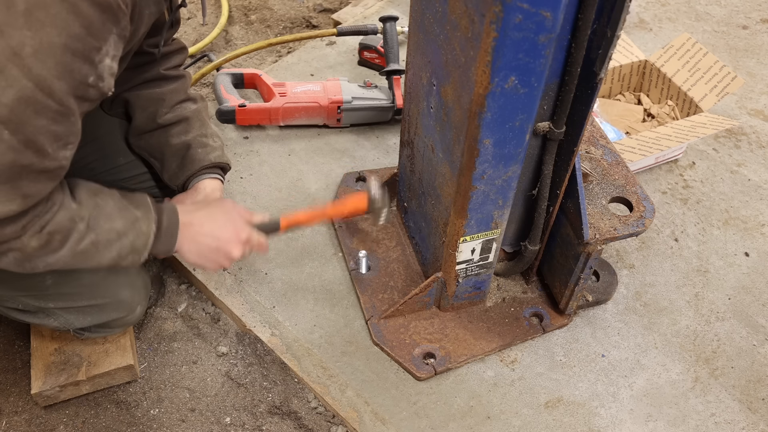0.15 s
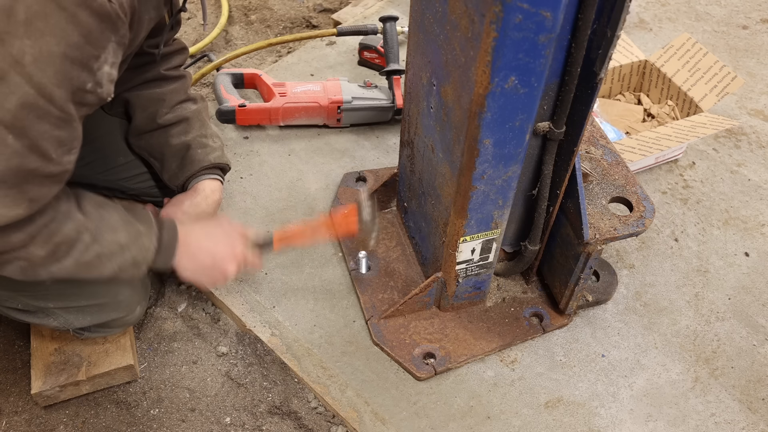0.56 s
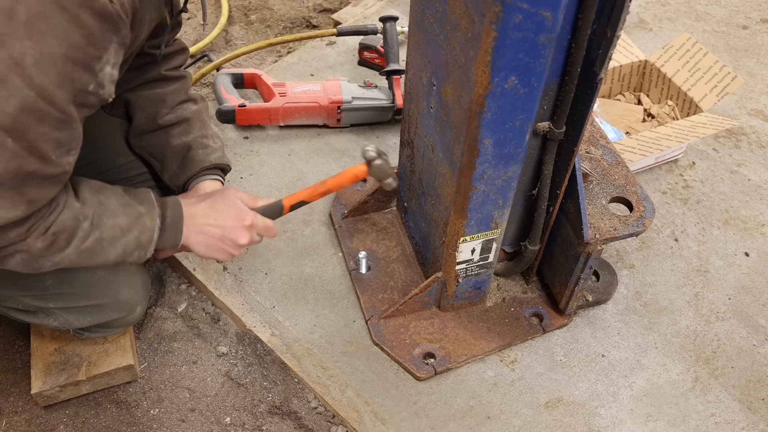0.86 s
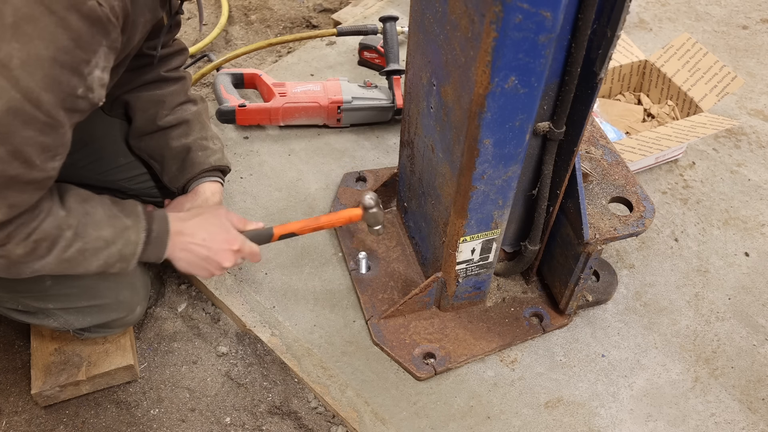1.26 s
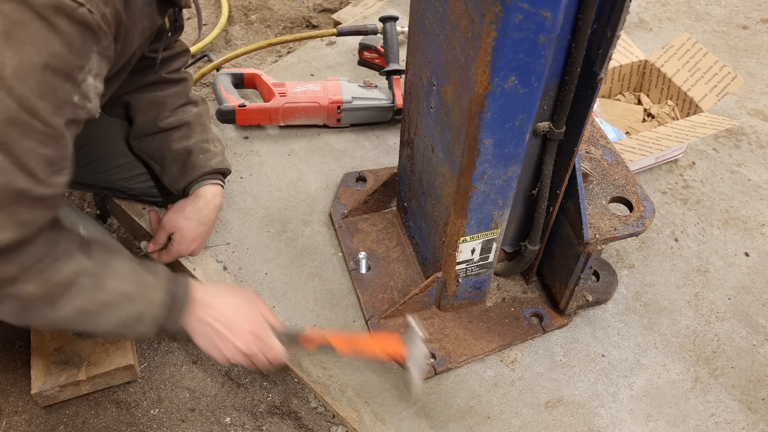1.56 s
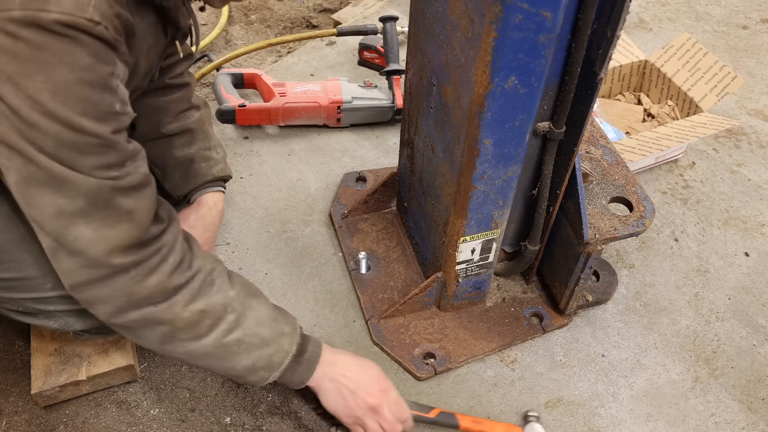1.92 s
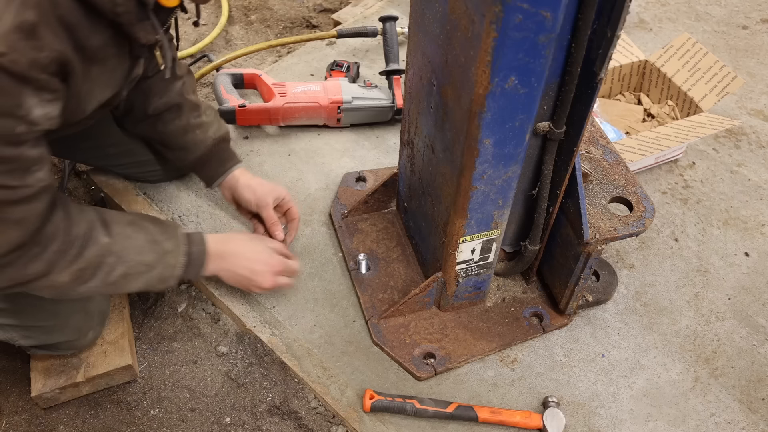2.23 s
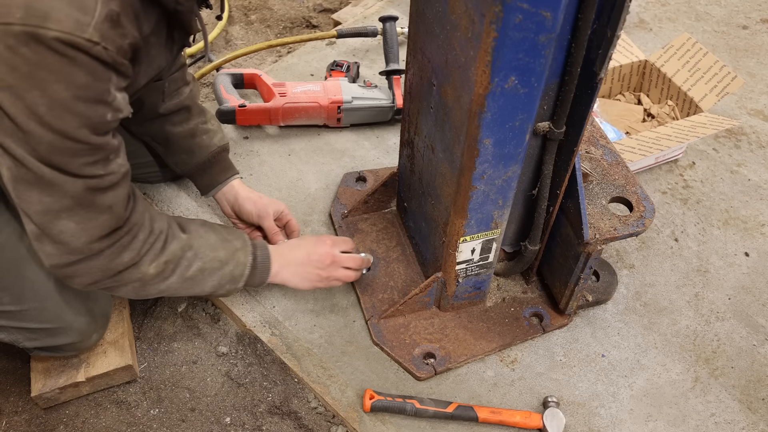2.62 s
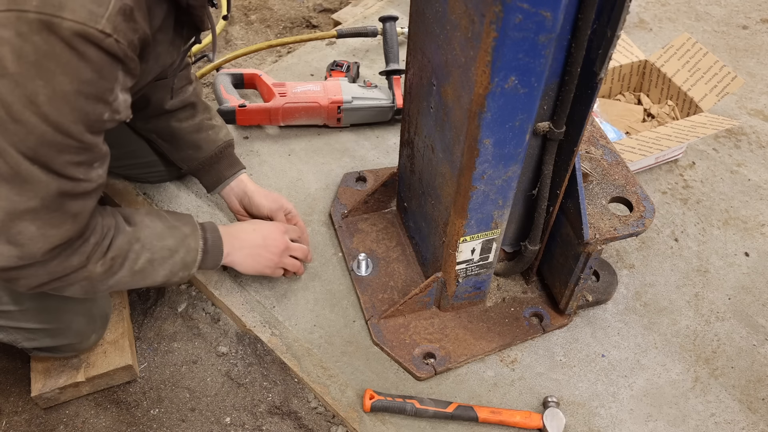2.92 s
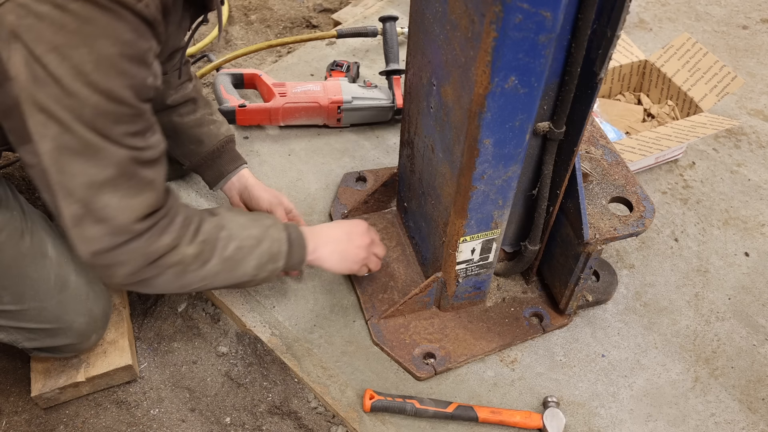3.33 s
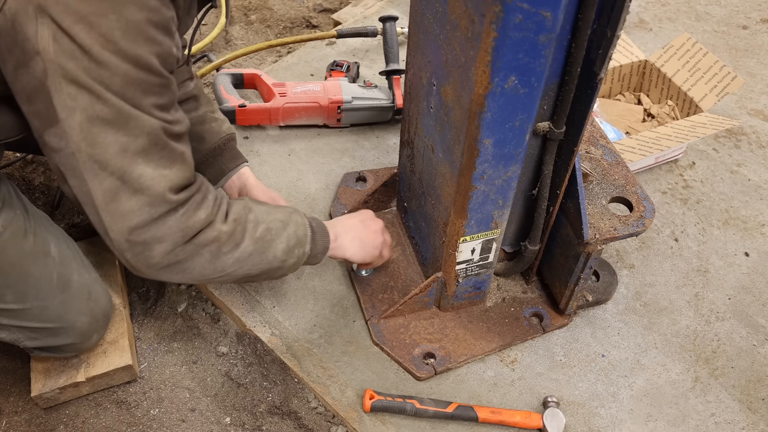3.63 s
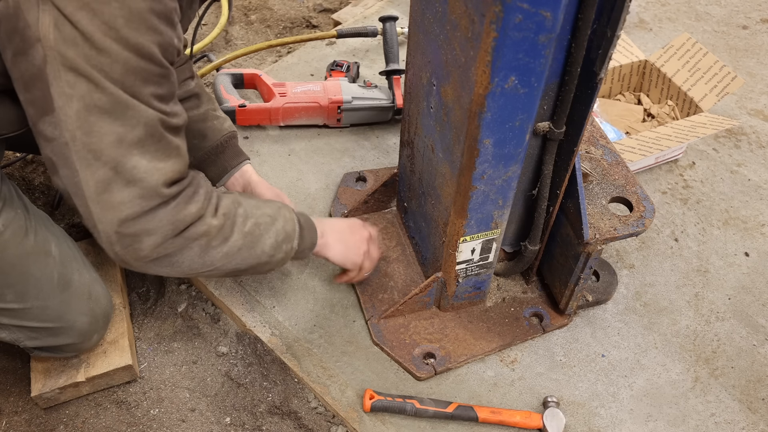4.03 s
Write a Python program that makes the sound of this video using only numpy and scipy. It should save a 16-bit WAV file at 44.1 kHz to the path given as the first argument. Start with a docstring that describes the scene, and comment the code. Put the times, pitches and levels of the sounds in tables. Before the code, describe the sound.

Close, single-channel pickup in a moderately echoing workshop: several loud, bright hammer blows on a steel anchor bolt, with plate buzz, slab thud and a hollow post hum. A jacket rustles, the hammer is put down on concrete in dull knocks and a hard clack, a washer ticks and rings down the thread onto the plate, then faint distant clanks and a nut's scrape.

```python
"""A hammer drives an anchor bolt through a post's steel base plate into a concrete workshop floor: noise cracks
over dying modes of bolt, plate, slab and post. A jacket rustles as noise that follows the arm. The hammer is
laid down in dull knocks and its handle clacks. A washer ticks down the thread, its beating tone ringing, and
lands on the plate. Metal clanks further off, and a nut scrapes and ticks as it is started. Quiet hall air lies
beneath from the start."""
import sys
import numpy as np
from scipy import signal
from scipy.fft import rfft, irfft
from scipy.io import wavfile
from scipy.ndimage import uniform_filter1d

SR = 44100
rng = np.random.default_rng(int(sys.argv[2]) if len(sys.argv) > 2 else 0)


def master(y):
    """Save y as 16-bit WAV."""
    cut = np.clip(np.atleast_2d(y).T, -1, 1)
    pcm = np.round(cut * 32767)  # scale
    wavfile.write(sys.argv[1], SR, pcm.astype(np.int16))


N = 184179
T = np.arange(SR) / SR  # one second of time [s]

# hum of the hollow post: (frequency [Hz], relative level [dB], unshortened t60 [s])
POST_MODES = [(147.6, -22, 0.87), (186, -23, 0.98), (243, -28, 0.1), (366, -26.5, 0.8),
              (445.5, -25.5, 0.36)]
# noise of steel meeting steel, for the landing and the far clanks: (frequency [Hz], level per Hz [dB])
CLANK_COLOUR = [(60, -10), (300, -22.5), (550, -15.5), (1300, 4), (2000, -6), (3000, 1.5), (5000, -11),
                (8000, -21), (15000, -48)]


def gain_of(db):
    """Turns decibels into an amplitude factor."""
    return np.exp(np.maximum(db, -300) * (np.log(10) / 20))


def evened(x):
    """Scales a signal to an rms of one."""
    return x / np.sqrt(np.mean(x ** 2) + 1e-20)


def read(points, hz):
    """Reads a table on a log-frequency axis."""
    f, value = np.transpose(points)
    return np.interp(np.log(hz + 1), np.log(f + 1), value)


def add(mix, s, sound):
    """Mixes a sound in at time s, trimming what lies outside the scene."""
    start = round(s * SR)
    sound = sound[max(-start, 0):]
    part = mix[max(start, 0):][:len(sound)]
    part += sound[:len(part)]


def slope_db(hz, tilt):
    """Brightens or dulls by tilt dB per octave about 3 kHz, levelling out below 300 Hz."""
    return tilt * np.log2(np.maximum(hz, 300) / 3000)


def noise(spectrum, size, tilt=0):
    """Noise of a given colour and random phase, at an rms of one."""
    hz = np.fft.rfftfreq(size, 1 / SR)
    phase = np.exp(2j * np.pi * rng.random(len(hz)))
    level_db = read(spectrum, hz) + slope_db(hz, tilt)
    return evened(irfft(gain_of(level_db) * phase, size))


def contact(spectrum, crest_s, fall_s, size=2048):
    """The brief crunch of two hard faces meeting: noise that rises to a crest and dies."""
    t = T[:size]
    rise = np.minimum(t / crest_s, 1)
    fall = np.exp(-np.maximum(t - crest_s, 0) / fall_s)
    return np.pad(noise(spectrum, size)[:size] * rise * fall, (0, SR - size))


def favour(x, hz, db, width=0.026):
    """Lifts a band around hz: where a blow lands decides what speaks most."""
    b, a = signal.iirpeak(min(hz, .45 * SR), 1 / width, fs=SR)
    return x + (gain_of(db) - 1) * signal.lfilter(b, a, x)


def ring(modes, rise_s, pitch=1):
    """Dying modes that build up during the contact; the pitch factor may be a curve."""
    clock = np.cumsum(pitch * np.ones(SR)) / SR
    waves = 0
    for hz, db, t60 in modes:
        waves = waves + gain_of(db - 60 * T / t60) * np.sin(2 * np.pi * hz * clock)
    return waves * (1 - np.exp(-T / rise_s))


def hall(x, length=1, delay_s=0.0069):
    """Dense echoes from floor and walls, in which the higher treble dies sooner."""
    # decay of the hall at length 1: (frequency [Hz], t60 [s])
    hall_decay = [(60, 0.2), (170, 0.6), (400, 0.68), (1200, 0.49), (3000, 0.38), (7000, 0.31),
                  (11000, 0.25), (15000, .18)]
    # colour of the echoes: (frequency [Hz], level [dB])
    hall_colour = [(50, -10), (100, -4), (170, 1), (240, -0.5), (480, 6.5), (700, 4), (1200, -4),
                   (3000, -5.5), (8000, -3), (15000, -7.5)]
    hz, t, z = signal.stft(rng.choice([-1., 1.], SR), SR, nperseg=256)
    fall_db = 60 * t / (length * read(hall_decay, hz)[:, None])
    z = z * gain_of(read(hall_colour, hz)[:, None] - fall_db)
    tail = signal.istft(z, SR, nperseg=256)[1][:SR]
    near = 1 + 1.0 * np.exp(-T / 0.0086)  # the post and the floor answer first
    onset = 1 - np.exp(-(T / delay_s) ** 2)
    tail = tail * near * onset / np.sqrt(0.028 * SR)
    return signal.fftconvolve(x, tail)[:SR]


def taps(rows, spectrum, modes, modes_db, crest_s, fall_s, length):
    """Light contacts on one steel object, each with its own brightness and share of echo."""
    out, hz = np.zeros(N), np.fft.rfftfreq(SR, 1 / SR)
    tone = gain_of(modes_db) * ring(modes, crest_s)
    for s, db, tilt, room_db in rows:
        tap = contact(spectrum, crest_s, fall_s) + tone
        coloured = irfft(rfft(tap) * gain_of(slope_db(hz, tilt)), SR) * (T < .5)
        # the brightness leaves the energy as it was
        tap = coloured * np.linalg.norm(tap) / np.linalg.norm(coloured)
        add(out, s, gain_of(db) * (tap + gain_of(room_db) * hall(tap, length)))
    return out


def rub(spectrum, length, tilt=0, grit_db=3):
    """A short slide of one surface on another: noise whose level is roughened by grit."""
    size = int(length * SR)
    grit = gain_of(grit_db * evened(uniform_filter1d(rng.standard_normal(SR), size=80)))
    return evened((noise(spectrum, SR, tilt) * grit)[:size]) * signal.windows.tukey(size, .5)


def chatter(rise_s=.006):
    """The struck plate buzzes against the concrete: noise that swells quickly and dies away."""
    # colour of the buzz: (frequency [Hz], level per Hz [dB])
    clatter_colour = [(300, -24), (880, 2.5), (1300, 3), (1750, -5.5), (2400, -3), (3000, -6.5),
                      (3700, 0.5), (4300, -14), (8000, -28)]
    level_db, t60_s = -22.5, 0.39
    envelope = gain_of(level_db - 60 * T / t60_s) * (1 - np.exp(-T / rise_s))
    return envelope * noise(clatter_colour, SR)


def hammering():
    """Each blow cracks, rings bolt and plate, thuds into the slab and sets the hollow post humming."""
    # blows and rebounds: (time [s], level [dB], band favoured by the spot struck [Hz], its lift [dB],
    # share reaching the plate and its chatter [dB], share reaching the post [dB])
    blows = [(-0.035, -25, 600, 15, -8.5, -5.5), (0.005, -36, 8500, 19, -7, -9.5),
             (0.0168, -35, 3050, 9, -6.5, -7), (0.1137, -20.5, 8600, 12, -8.5, -4),
             (0.21, -48.5, 3700, 16, 1.5, -6), (0.604, -23.5, 2510, 6.5, -13.5, -2.5),
             (1.0153, -21.5, 2280, 4.5, 2, -1), (1.0263, -32, 3560, 14.5, -5, 2)]
    # crack of steel on steel: (frequency [Hz], level per Hz [dB])
    crack_colour = [(40, -3.5), (150, 7.5), (320, 0.5), (620, -6.5), (900, -2.5), (1250, 2.5), (1650, -4),
                    (2400, 0.5), (3700, -4), (4700, -9), (6600, -6.5), (9000, -8), (12000, -23.5),
                    (15500, -33.5)]
    # bolt, before the pitch factor: (frequency [Hz], relative level [dB], t60 [s])
    bolt_modes = [(3678, -7, 0.051), (3220, -18.5, 0.017), (7300, -12, 0.035), (11360, 2.5, 0.025),
                  (11340, -12.5, 0.022)]
    # plate: (frequency [Hz], relative level [dB], t60 [s])
    plate_modes = [(873, -6, 0.12), (960, -14, 0.27), (1148, -8, .1), (1266, -10.5, 0.21),
                   (1230, -26.5, 0.64), (1453, -20, 0.51), (2324, -17, .18), (2960, -18, 0.16),
                   (3590, -20, 0.19), (3780, -19.5, .26), (5100, -4, 0.015), (8270, -15, 0.065),
                   (8510, -7, 0.085), (8400, -8, 0.07)]
    # slab: (frequency [Hz], relative level [dB], t60 [s])
    thud_modes = [(48.3, -8.5, 0.097), (84, -14.5, 0.066), (160.6, -12, 0.13), (308, -3, 0.074),
                  (380, -7, 0.066)]
    squeal_ref_hz = 11300  # the bolt's squeal at a pitch factor of one
    squeal_first_hz, squeal_sag_hz_per_s = 11200, 620  # it sinks as the bolt is driven in
    thud_db, thud_softness = -4, .15  # thud share of the hardest blow; dB more for each dB softer
    room_db, ring_length = -3, 0.77  # echo share; length factor of post hum and echo
    out, plate, thud = np.zeros(N), ring(plate_modes, 0.0018), ring(thud_modes, 0.0023)
    hum = ring([(hz, level, t60 * ring_length) for hz, level, t60 in POST_MODES], 0.012)
    hardest_db = max(row[1] for row in blows)
    for s, db, spot_hz, spot_db, plate_db, post_db in blows:
        crack = favour(contact(crack_colour, crest_s=0.0023, fall_s=0.0034), spot_hz, spot_db)
        # the hole grips unevenly, so the bolt rings roughly
        grip = 1 + .022 * evened(uniform_filter1d(rng.standard_normal(SR), size=40))
        squeal_hz = squeal_first_hz - squeal_sag_hz_per_s * s
        bolt = ring(bolt_modes, 0.002, grip * squeal_hz / squeal_ref_hz)
        steel = gain_of(-2.5) * bolt + gain_of(plate_db - 9.0) * plate + gain_of(plate_db) * chatter()
        blow_thud_db = thud_db + thud_softness * (hardest_db - db)
        body = gain_of(blow_thud_db) * thud + gain_of(post_db) * hum
        sent = gain_of(1.0) * crack + gain_of(-4.5) * steel + gain_of(-19) * body
        echo = hall(sent, ring_length)
        add(out, s, gain_of(db) * (crack + steel + body + gain_of(room_db) * echo))
    return out


def hall_air(level_db=-76.5):
    """The quiet air of the hall, a steady coloured noise."""
    # colour of the air: (frequency [Hz], level per Hz [dB])
    air_colour = [(15, -53), (25, -14.5), (163, 2), (250, -14), (326, -4), (1030, -21), (1280, -13.5),
                  (1460, -18), (9770, -31), (15000, -33.5)]
    return gain_of(level_db) * noise(air_colour, N)


def movement(rise_s=.17, fall_s=0.2):
    """How briskly the arm moves, as an amplitude: each movement swells, holds and dies away."""
    # the arm puts the hammer away, fetches the washer, fetches the nut, turns it:
    # (time [s], length before the fall [s], strength [dB])
    moves = [(1.16, 0.81, -67), (2.152, 0.69, -67), (3.035, 0.51, -70), (3.601, .55, -74.5)]
    t = np.arange(N) / SR
    swells = []
    for s, length, db in moves:
        rise = np.clip((t - s) / rise_s, 0, 1)
        fall = np.exp(-np.maximum(t - s - length, 0) / fall_s)
        swells.append(gain_of(db) * rise * fall)
    return np.linalg.norm(swells, axis=0)


def jacket(grain_db=1.0, body_db=3):
    """Cloth rustles as grainy noise with the arm's movement, with faint rising zips."""
    # colour of the cloth: (frequency [Hz], level per Hz [dB])
    cloth_colour = [(35, -37), (60, 0.5), (364, 0), (648, -4.5), (895, -4), (1390, -7.5), (2650, -14),
                    (3050, -14), (4730, -25), (6380, -18), (13100, -33.5), (15000, -52.5)]
    # the sleeve zips as the arm swings:
    # (time [s], length [s], first frequency [Hz], last frequency [Hz], level [dB])
    zips = [(1.23, 0.23, 6200, 7500, -84), (1.602, 0.15, 2520, 3490, -71)]
    fizz_db, fizz_follow = -75, 0.58  # treble in the briskest movement; dB for each dB of the body
    grain = gain_of(grain_db * evened(uniform_filter1d(rng.standard_normal(N), size=300)))
    cloth = noise(cloth_colour, N) * grain
    body = signal.sosfiltfilt(signal.butter(2, 3200, fs=SR, output="sos"), cloth)
    arm = movement()
    fizz_level = gain_of(fizz_db) * (arm / arm.max()) ** fizz_follow
    out = gain_of(body_db) * arm * evened(body) + fizz_level * evened(cloth - body)
    for start, length, first_hz, last_hz, db in zips:
        size = int(length * SR)
        waver = 1 + 0.032 * evened(uniform_filter1d(rng.standard_normal(N), size=40))[:size]
        hz = first_hz + (last_hz - first_hz) * np.sin(np.linspace(0, np.pi / 2, size))
        tone = np.sin(2 * np.pi * np.cumsum(hz * waver) / SR)
        add(out, start, gain_of(db) * tone * signal.windows.tukey(size, .5))
    return out


def laying_down(hum_db=-36):
    """The head is set on the concrete and stirs the post a little; the handle follows with a dead clack."""
    # the hammer touches down: (time [s], level [dB], brightness [dB per octave], room [dB])
    knocks = [(1.7508, -50, -3.5, -12), (1.8135, -57, 1.5, -19), (1.853, -46, -5.5, -3),
              (1.9325, -55, -2, -3), (2.0988, -32.5, 3.5, -17.5), (2.103, -39, 1, -0.5)]
    # noise of steel on concrete: (frequency [Hz], level per Hz [dB])
    knock_colour = [(50, -17), (170, 7.5), (300, -7), (550, 10), (800, 1), (1300, 3.5), (2200, -5),
                    (3100, -3), (4500, -7), (7000, -8.5), (10000, -23.5), (15000, -38)]
    # hammer head: (frequency [Hz], relative level [dB], t60 [s])
    head_modes = [(1040, -3, 0.028), (1276, 3, 0.032), (1970, -3, 0.041), (3207, 5.5, 0.029),
                  (3274, -5, 0.037), (3470, 3, 0.019), (4400, -28, 0.011)]
    # the handle drops last with a dead clack that does not ring: (time [s], level [dB])
    handle = (2.1897, -34)
    out = taps(knocks, knock_colour, head_modes, modes_db=-3.5, crest_s=0.0013, fall_s=0.0024, length=0.74)
    hardest = max(knocks, key=lambda row: row[1])
    add(out, hardest[0], gain_of(hum_db) * ring(POST_MODES, 0.0017) * np.exp(-T / .19))
    s, db = handle
    clack = favour(contact(knock_colour, crest_s=0.0025, fall_s=0.0012), hz=3020, db=15, width=0.15)
    add(out, s, gain_of(db) * clack)
    return out


def scuffs():
    """Sleeve and grit scuff in short gritty slides."""
    # slides: (time [s], length [s], level [dB], brightness [dB per octave])
    scuff_rows = [(1.801, 0.05, -62, -0.5), (1.846, 0.044, -56, -4), (1.943, 0.064, -63, -8),
                  (2.385, 0.017, -62, -5), (3.941, 0.034, -61, -6.5)]
    # colour of the scuffs: (frequency [Hz], level per Hz [dB])
    scuff_colour = [(100, -4), (400, -3), (1500, -4.5), (3500, -4), (5200, -10), (7000, 10.5), (9000, -7),
                    (15000, -13)]
    out = np.zeros(N)
    for s, length, db, tilt in scuff_rows:
        add(out, s, gain_of(db) * rub(scuff_colour, length, tilt))
    return out


def threading(count=3):
    """Single ticks as the washer is picked up and on the thread, and runs in which the washer catches on one
    turn after another."""
    # washer and nut tick, first as the washer is picked up, then on the thread: (time [s], level [dB],
    # brightness [dB per octave])
    ticks = [(2.314, -50, 22.5), (2.3207, -52, 20), (2.583, -33, 4), (2.589, -37.5, -7), (2.6398, -34, 9.5),
             (2.6665, -46, -0.5), (2.368, -60, 10.5), (3.878, -56, -5), (4.0177, -54, -5.5),
             (4.022, -57, -9)]
    # the washer skips down in short runs: (time [s], level [dB])
    skips = [(2.6934, -48), (2.7236, -45)]
    # noise of a tick: (frequency [Hz], level per Hz [dB])
    tick_colour = [(60, -13), (400, -24.5), (1500, -16.5), (3300, 3), (5200, -11.5), (7000, -1.5),
                   (10000, -27.5), (15000, -39.5)]
    # ring of a tick: (frequency [Hz], relative level [dB], t60 [s])
    thread_modes = [(3304, -1.5, 0.042), (3420, -4.5, 0.037), (3700, -6.5, 0.034), (7300, -11, 0.0054)]
    skip_gap_s, skip_tilt = .0069, 0  # time from turn to turn; brightness in dB per octave
    room_db = -10
    runs = [(s + k * skip_gap_s, db, skip_tilt) for s, db in skips for k in range(count)]
    rows = [(s, db, tilt, room_db) for s, db, tilt in ticks + runs]
    return taps(rows, tick_colour, thread_modes, modes_db=-5, crest_s=0.00048, fall_s=.0012, length=1.0)


def washer(depth=0.5, t60=0.4, room_db=-22, flutter_db=-27):
    """The washer's bending mode is split in two and beats as it wobbles down the bolt."""
    # each contact sets the ring going anew: (time [s], level [dB], time until the swell's crest [s])
    rings = [(2.583, -30.5, 0.0086), (2.6404, -23.5, 0.028), (2.676, -26, .04), (2.737, -26.5, 0.022),
             (2.792, -46, 0.037)]
    washer_hz, beat_hz = 8430, 16  # pitch; distance between the two halves of the split mode
    t = np.arange(N) / SR
    s, db, crest = np.transpose(rings)
    last = np.maximum(np.searchsorted(s, t) - 1, 0)  # the latest contact at each moment
    age = t - s[last]
    pair = abs(1 + depth * np.exp(2j * np.pi * beat_hz * (age - crest[last]))) / (1 + depth)
    decay = gain_of(db[last] - 60 * np.maximum(age, 0) / t60)
    level = uniform_filter1d((age > 0) * pair * decay, size=50)
    tone = np.sqrt(2) * level * np.sin(2 * np.pi * washer_hz * t)
    # a low flutter goes with it
    flutter = noise([(15, -6.5), (38, 2.5), (90, -19.5), (400, -47.5), (2000, -66.5)], N)
    out = tone + gain_of(flutter_db) * level * flutter
    add(out, s[0], gain_of(room_db) * hall(tone[round(s[0] * SR):][:SR], length=0.65))
    return out


def washer_landing():
    """The washer lands on the plate: bright contacts over short dying modes."""
    # contacts: (time [s], level [dB], brightness [dB per octave], room [dB])
    landings = [(2.778, -44, -4, 0), (2.7925, -37.5, 1, 1)]
    # washer on plate: (frequency [Hz], relative level [dB], t60 [s])
    seat_modes = [(1080, -29.5, 0.11), (1220, -15, 0.14), (1236, -9, 0.11), (1408, -16.5, .22),
                  (1340, -20, 0.2), (1540, -15.5, 0.25), (2925, -3.5, 0.044)]
    return taps(landings, CLANK_COLOUR, seat_modes, modes_db=-0.5, crest_s=0.00077, fall_s=0.0019, length=0.92)


def far_clanks():
    """Steel clanks further off: contacts and dying modes with their echoes."""
    # contacts: (time [s], level [dB], brightness [dB per octave], room [dB])
    clanks = [(3.3795, -40.5, -0.5, 0.5), (3.3855, -42, 9.5, -4.5), (3.5432, -49, -1, -2.5),
              (4.0708, -43, 0, 3), (4.119, -44, 0.5, 12), (4.1265, -46, -8, -16), (4.135, -48, 3, -15),
              (4.148, -48, -10, -18)]
    # far steel: (frequency [Hz], relative level [dB], t60 [s])
    far_modes = [(468, -13.5, 0.057), (556, -18.5, 0.15), (720, -10, 0.08), (892, -9.5, 0.087),
                 (1136, -1, 0.022), (1322, -4.5, 0.069), (1363, -20, 0.059), (3074, -11, 0.1),
                 (3410, -17, .04), (4600, -12, 0.073)]
    return taps(clanks, CLANK_COLOUR, far_modes, modes_db=-4.0, crest_s=0.00097, fall_s=0.0023, length=0.77)


def nut_scrape():
    """The nut feels for the thread in a gritty scrape."""
    # slides: (time [s], length [s], level [dB])
    scrapes = [(3.789, 0.12, -62)]
    # colour of the scrape: (frequency [Hz], level per Hz [dB])
    scrape_colour = [(300, -13), (2000, -9), (2800, -9.5), (3350, 5), (4200, -17), (5500, -15.5),
                     (12000, -45)]
    out = np.zeros(N)
    for s, length, db in scrapes:
        add(out, s, gain_of(db) * rub(scrape_colour, length))
    return out


def scene():
    """All sources over the quiet air of the hall, as one channel."""
    work = hammering() + jacket() + laying_down() + scuffs()
    fitting = threading() + washer() + washer_landing() + nut_scrape()
    return (work + fitting + far_clanks() + hall_air())[None]


def record(dry):
    """A steep low-pass limits the band of the microphone signal."""
    lowpass = signal.firwin(255, 15800, window=("kaiser", 9), fs=SR)  # edge in Hz
    return signal.oaconvolve(dry, lowpass[None], "same")


dry = scene()
out = record(dry)
master(out)
```